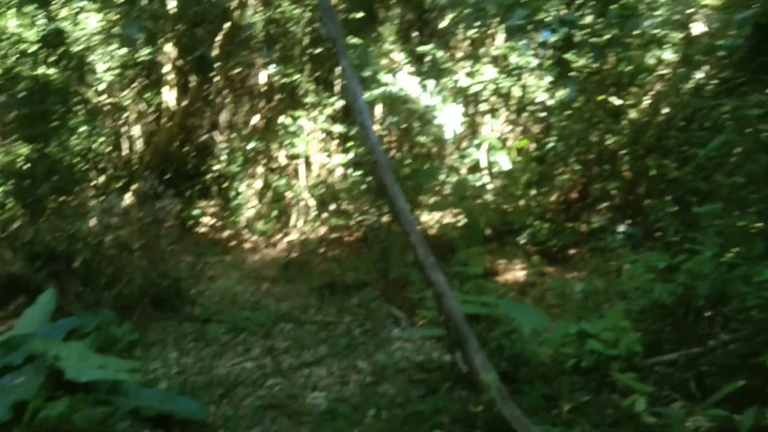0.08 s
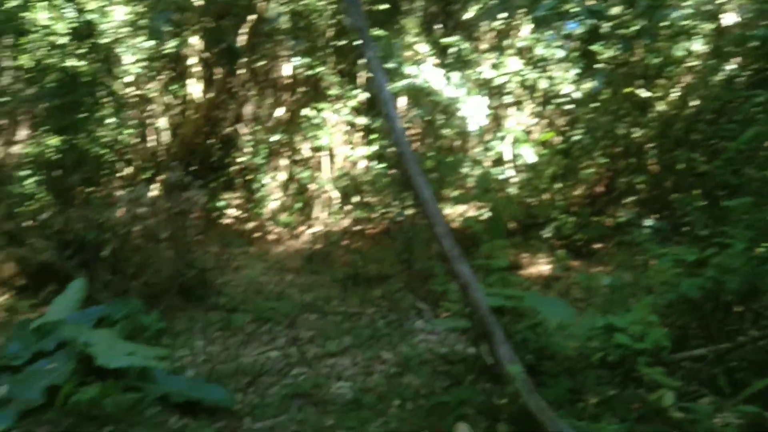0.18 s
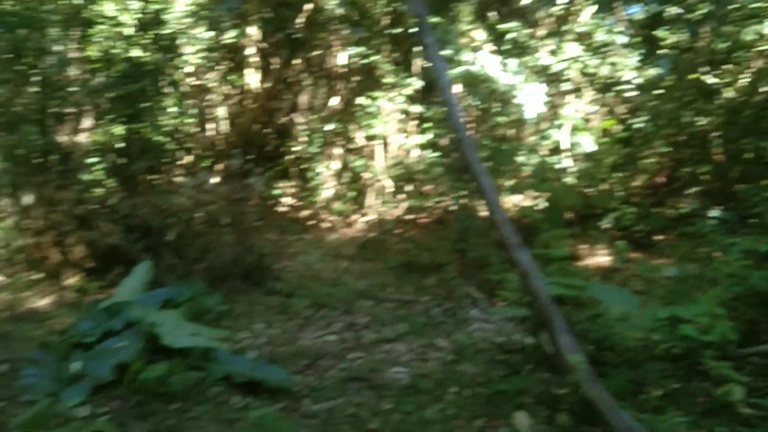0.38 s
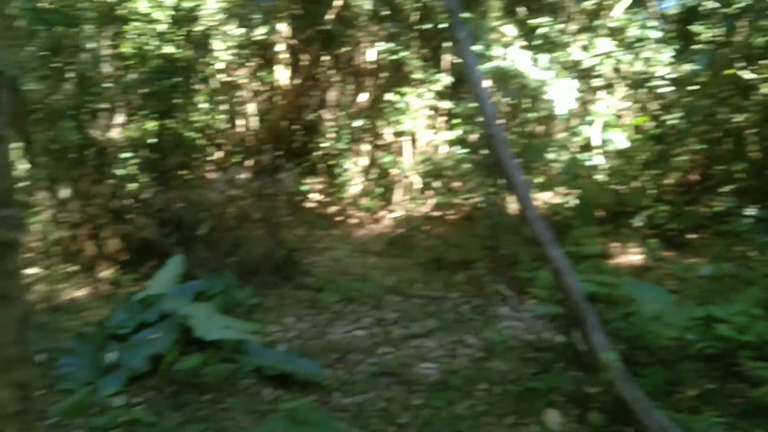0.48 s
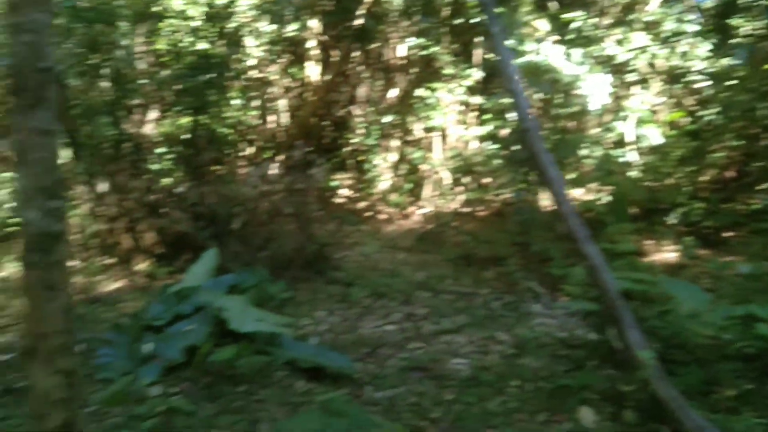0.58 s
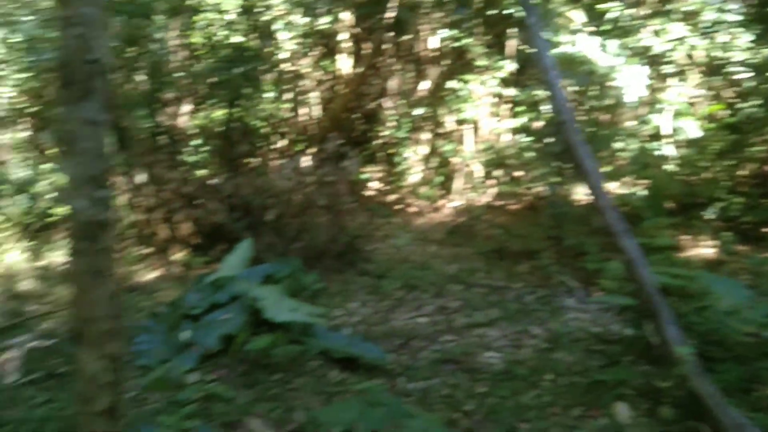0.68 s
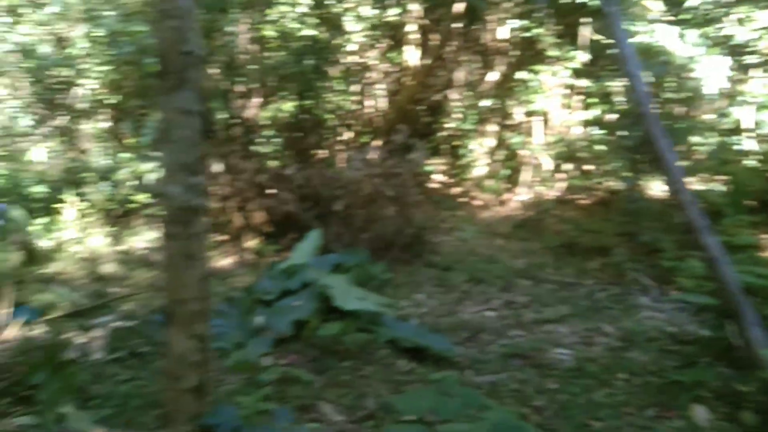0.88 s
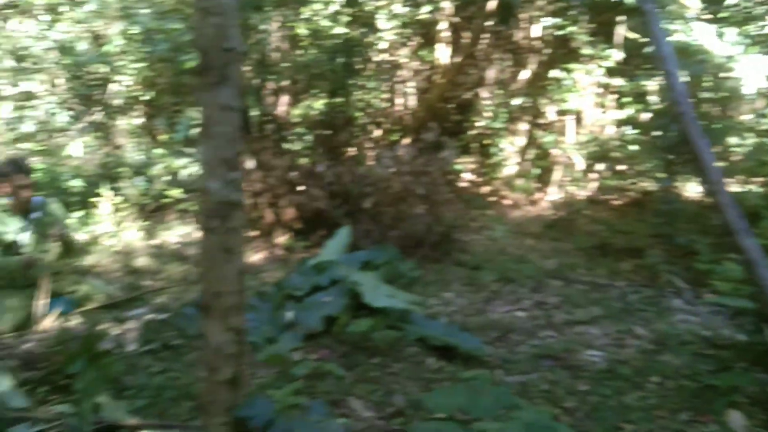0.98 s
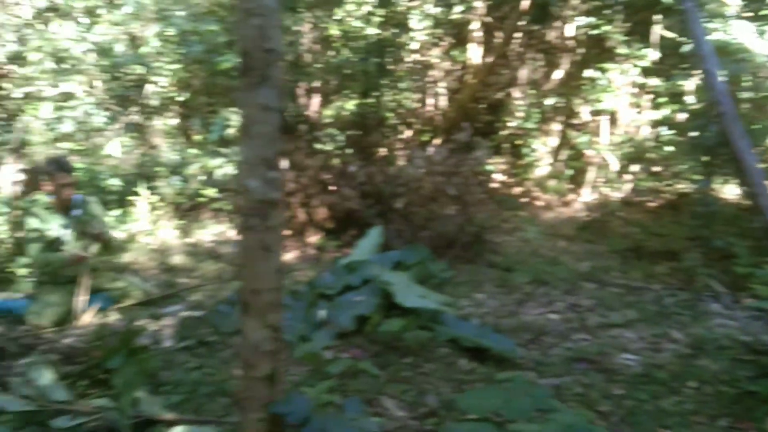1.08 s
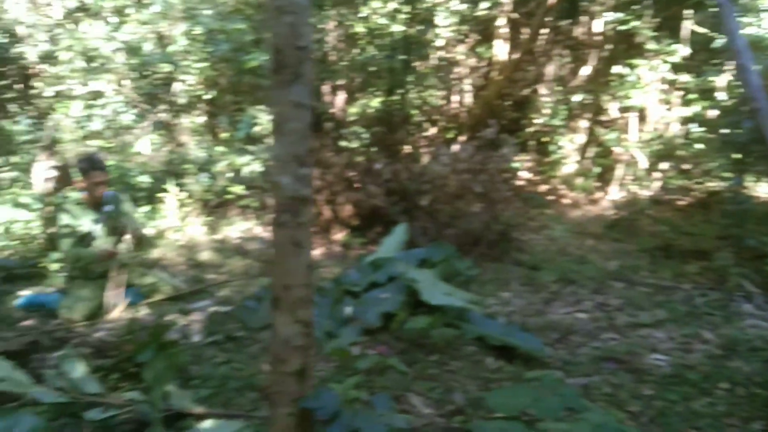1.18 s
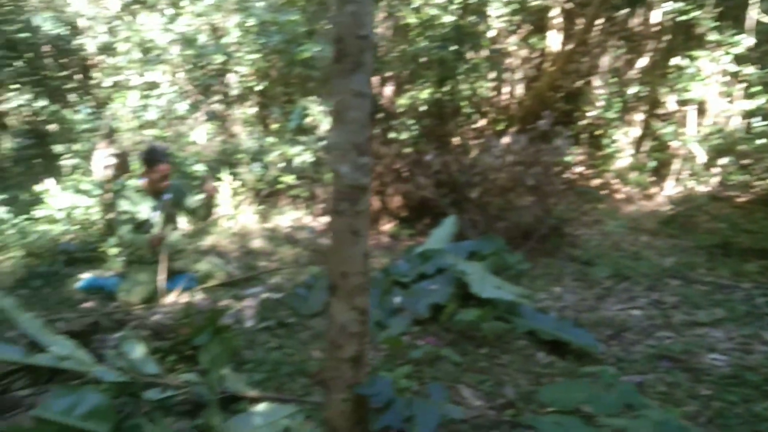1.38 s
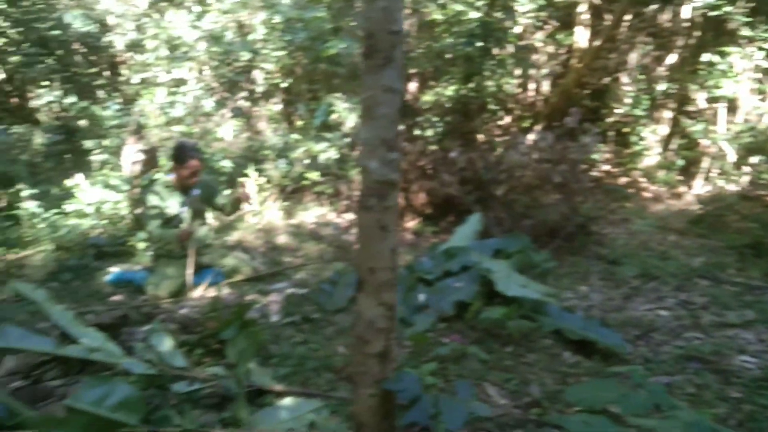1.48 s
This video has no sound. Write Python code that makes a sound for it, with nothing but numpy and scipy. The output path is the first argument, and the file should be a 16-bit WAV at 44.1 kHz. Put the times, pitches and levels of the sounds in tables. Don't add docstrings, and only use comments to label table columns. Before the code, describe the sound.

A close footstep crunches dry leaves and snaps twigs on a quiet forest floor

```python
import sys
import numpy as np
from scipy import signal
from scipy.fft import rfft, irfft
from scipy.io import wavfile
from scipy.ndimage import uniform_filter1d

SR = 44100
rng = np.random.default_rng(int(sys.argv[2]) if len(sys.argv) > 2 else 0)


def unload_wav(signal):
    wavfile.write(
        sys.argv[1],
        SR,
        np.round(np.clip(np.atleast_2d(signal).T, -1, 1) * 32767).astype(np.int16),
    )


def level_to_linear(level):
    exponent = np.asarray(level, float) / 20
    return 10 ** exponent


N = 66150


def at_hz(points, hz, axis=1):
    points = np.array(points)
    return np.interp(np.log(hz), np.log(points[:, 0]), points[:, axis])


def rms_one(x):
    return x / np.sqrt(np.mean(x ** 2) + 1e-20)


def band_pass(x, low_hz, high_hz, order=2):
    return signal.sosfilt(signal.butter(order, [low_hz, high_hz], "band", fs=SR, output="sos"), x)


def drift(rate_hz):
    r = np.exp(-2 * np.pi * rate_hz / SR)
    wander = signal.lfilter([1], [1, -2 * r, r * r], rng.standard_normal(N + SR))
    return rms_one(wander[SR:])


def ring(clicks, hz, t60):
    r = level_to_linear(-60 / (t60 * SR))
    w = 2 * np.pi * hz / SR
    return signal.lfilter([0, np.sin(w)], [1, -2 * r * np.cos(w), r * r], clicks + 1e-18)


def coloured(x, spectrum, peaks=()):
    hz = np.maximum(np.arange(len(x) // 2 + 1) * SR / len(x), 1)
    lift_db = sum(db / (1 + ((hz - mid) / width * 2) ** 2) for mid, width, db in peaks)
    return rms_one(irfft(rfft(x) * level_to_linear(at_hz(spectrum, hz) + lift_db), len(x)))


def crackle(spectrum, peaks):
    cracks_per_s, spread_db, cycles, clump_db = 16000, 2.5, 7.0, 1.5
    sizes = level_to_linear(spread_db * np.minimum(rng.exponential(1, N), 5)) * rng.choice([-1, 1], N)
    born = rng.random(N) < cracks_per_s * level_to_linear(clump_db * drift(150)) / SR
    pitches = np.geomspace(250, 16000, 30)
    dealt = rng.integers(0, 30, N)
    flat = np.zeros(N)
    for k, hz in enumerate(pitches):
        rung = ring(sizes * born * (dealt == k), hz, cycles / hz)
        flat += rms_one(rung) * np.sqrt(hz)
    return coloured(flat, spectrum, peaks)


# (pitch [Hz], level [dB per Hz])
AIR_COLOUR = [(30, -16), (100, -2), (300, -9), (800, -12.5), (4400, -19), (6500, -20.5), (8500, -33),
              (15500, -32.5)]


def air():
    hiss = level_to_linear(-68.5) * coloured(rng.standard_normal(N), AIR_COLOUR)
    rumble = rms_one(band_pass(rng.standard_normal(N), 60, 266))
    lumps_db = 3 * drift(34)
    return hiss + level_to_linear(-73 + lumps_db) * rumble


# (start [s], end [s], pitch [Hz], width [Hz], level [dB])
INSECT_CALLS = [
    (-.1, .85, 5950, 500, -80),
    (.84, 1.04, 6230, 200, -78),
    (1.02, 1.6, 6200, 300, -72),
    (.865, .935, 2820, 250, -76),
    (.82, 1.02, 4270, 120, -79),
    (1.0, 1.08, 4380, 120, -76),
    (1.04, 1.13, 2250, 120, -79),
    (.57, .72, 3450, 400, -78),
]


def insects():
    trill_per_s, depth, fade_s, evenness = 48, .55, .02, .6
    out, t = np.zeros(N), np.arange(N) / SR
    for start, end, hz, width, db in INSECT_CALLS:
        call = band_pass(rng.standard_normal(N), hz - width / 2, hz + width / 2)
        envelope = np.abs(signal.hilbert(rms_one(call)))
        call = rms_one(call / (envelope + .1) ** evenness)
        throb = 1 + depth * np.sin(2 * np.pi * trill_per_s * t + .6 * drift(4))
        fade = np.clip(np.minimum(t - start, end - t) / fade_s, 0, 1)
        out += level_to_linear(db) * call * throb * fade
    return out


# (time [s], level [dB], decay [dB per s])
LITTER_STIRS = [
    (.0, -71.5, 91),
    (.63, -65, 111),
    (1.029, -62.5, 60),
    (1.082, -76, 55),
    (1.165, -70, 68),
    (1.23, -79, 38),
    (1.313, -66.5, 75),
]
# (pitch [Hz], level [dB per Hz])
LITTER_COLOUR = [(250, -4), (500, 3.5), (1500, -7), (3500, -3.5), (6000, -7), (7500, -18), (11000, -24),
                 (15500, -30)]


def stirred_litter():
    t = np.arange(N) / SR
    level = np.zeros(N)
    for s, db, fall in LITTER_STIRS:
        level += level_to_linear(db - fall * np.maximum(t - s, 0)) * (t >= s)
    return uniform_filter1d(level, size=80) * crackle(LITTER_COLOUR, [])


# (time [s], peak level [dB], pitch [Hz], ring t60 [s])
SOIL_THUDS = [(0.0419, -47.5, 235, 0.014), (0.08, -59, 202, 0.033), (0.281, -49.5, 100, 0.073),
              (0.315, -42.5, 91.5, 0.066), (.345, -48.5, 86, 0.09), (.43, -51.5, 78, 0.069),
              (0.459, -51, 91, .1), (0.502, -55, 105, 0.057), (0.601, -60, 68, 0.11),
              (0.643, -53.5, 113, 0.12), (.77, -55, 103, 0.076), (.81, -56, 75, 0.11),
              (0.886, -56, 203, 0.054), (1.028, -45.5, 98, .1), (1.0505, -48, 105, .08),
              (1.0835, -52, 100, .09), (1.1664, -42.5, 92, .065), (1.3112, -49, 210, .03),
              (1.3148, -45, 104, .085), (1.194, -56.5, 191, 0.16), (1.441, -53.5, 124, .06)]


def thuds():
    extra_pitch, sag_s, rise_s, lead_rad = .4, .003, .0005, 1.5
    out, t = np.zeros(N), np.arange(N) / SR
    for s, db, hz, t60 in SOIL_THUDS:
        u = np.maximum(t - s, 0)
        phase = 2 * np.pi * hz * (u + extra_pitch * sag_s * (1 - np.exp(-u / sag_s)))
        rise = 1 - np.exp(-(u / rise_s) ** 2)
        out += level_to_linear(db - 60 * u / t60) * rise * np.cos(phase - lead_rad)
    return out


# (pitch [Hz], level [dB], t60 [s])
TRUNK_ECHO = [(100, 7.5, 1), (370, -12, 1), (930, -17.5, 0.78), (2160, -4.5, 0.58), (3460, -18, 0.73),
              (5560, -11.5, 0.43), (11500, -14, 1)]


def wood(x):
    t, echo = np.arange(N) / SR, np.zeros(N)
    edges = 60 * 2 ** np.arange(0, 8.6, .5)
    for low, high in zip(edges, edges[1:]):
        noise = band_pass(rng.standard_normal(N), low, min(high, 20000))
        hz = np.sqrt(low * high)
        t60 = at_hz(TRUNK_ECHO, hz, axis=2)
        even_energy = np.sqrt(6 * np.log(10) / t60 / SR)
        echo += noise * level_to_linear(at_hz(TRUNK_ECHO, hz) - 60 * t / t60) * even_energy
    build_up = 1 - np.exp(-(t / 0.0027) ** 2)
    return signal.fftconvolve(x, echo * build_up)[:N]


# (time [s], level [dB])
FOOT_WEIGHT = [
    (0.205, -70),
    (0.213, -44),
    (0.239, -41.5),
    (0.276, -36.5),
    (0.283, -35),
    (0.294, -32.5),
    (0.313, -35),
    (0.318, -40.5),
    (.37, -50.5),
]
# (pitch [Hz], level [dB per Hz])
LEAF_COLOUR = [(250, -29.5), (1200, -14), (2400, -18), (3600, -4.5), (5400, -10), (7200, -15.5),
               (12500, -34), (15500, -29)]
# (pitch [Hz], width [Hz], lift [dB])
LEAF_HUMPS = [(2030, 630, 9), (3600, 1300, 6), (5660, 860, 9), (6630, 640, 8.5)]


def foot():
    s, db = np.transpose(FOOT_WEIGHT)
    weight_db = np.interp(np.arange(N) / SR, s, db, left=-120, right=-120)
    return level_to_linear(weight_db) * crackle(LEAF_COLOUR, LEAF_HUMPS)


# (time [s], peak level [dB], pitch [Hz], ring t60 [s])
TWIG_SNAPS = [(0.2102, -37.5, 3500, 0.015), (0.2145, -35.5, 2150, 0.015), (0.215, -41, 4770, 0.0044),
              (0.2194, -44.5, 2360, 0.0043), (0.2267, -34, 4200, 0.0046), (0.2409, -27, 4540, 0.0077),
              (0.2636, -34, 2280, 0.016), (0.265, -44, 3530, 0.011), (.2735, -26, 3600, .02),
              (0.2835, -14, 4000, 0.0064), (0.283, -21, 5450, 0.0089), (0.2866, -19, 5310, 0.012),
              (0.2905, -31, 5200, .01), (.2992, -20, 3600, 0.016), (0.3091, -20.5, 4180, 0.0058),
              (0.3117, -27, 478, 0.018), (.3122, -32, 658, 0.021), (0.3115, -22, 3740, 0.0074),
              (.313, -26.5, 985, 0.014), (.3005, -27, 4960, 0.0091), (.305, -25, 4630, 0.014),
              (.322, -49, 562, 0.044), (.3455, -28, 1966, 0.014), (0.3466, -30.5, 3770, 0.012),
              (.913, -57.5, 1900, 0.0085), (.81, -62, 795, 0.021)]


def twigs():
    click_db, side_db, splinter_s, top_hz = -8, -6.5, 0.0011, 7200
    out, chance = np.zeros(N), rng.random((len(TWIG_SNAPS), 5))
    for (s, db, hz, t60), c in zip(TWIG_SNAPS, chance):
        clicks = np.zeros(SR // 8)
        later = 1 + c[:2] * splinter_s * SR
        clicks[[0, *later.astype(int)]] = [1, -.6, .5]
        upper = ring(clicks, hz * (1.25 + .2 * c[2]), t60 * .5)
        lower = ring(clicks, hz * (.6 + .2 * c[3]), t60 * .5)
        sound = ring(clicks, hz, t60) + level_to_linear(side_db) * (upper - lower) + level_to_linear(click_db) * clicks
        sound = band_pass(sound, 200, top_hz)
        i = int(s * SR)
        out[i:i + len(clicks)] += (level_to_linear(db) * sound / np.abs(sound).max())[:N - i]
    return out


# (time [s], peak level [dB], lowest [Hz], highest [Hz])
DRY_TICKS = [(.2828, -34, 300, 11500), (.3118, -29, 300, 3000), (.3443, -28, 800, 5300),
             (.3552, -31, 150, 3000), (.584, -57, 1800, 3200), (.595, -56, 1800, 3200),
             (.9985, -56, 1400, 3000), (1.029, -54, 500, 5000), (1.083, -55, 1500, 5000),
             (1.1671, -55, 400, 2500), (1.312, -56, 300, 2000), (1.37, -56, 500, 5000)]


def ticks():
    t60, rise_s = .009, .0003
    t = np.arange(1024) / SR
    out = np.zeros(N + SR)
    fade = level_to_linear(-60 * t / t60) * (1 - np.exp(-t / rise_s))
    for s, db, low, high in DRY_TICKS:
        sound = band_pass(rng.standard_normal(len(t)) * fade, low, high, order=4)
        i = int(s * SR)
        out[i:i + len(t)] += level_to_linear(db) * sound / np.abs(sound).max()
    return out[:N]


def scene():
    background = air() + insects() + stirred_litter()
    soil = thuds()
    near = foot() + twigs() + ticks()
    return (background + soil + near + wood(near + 0.079 * soil))[None]


def band_limit(x):
    return signal.sosfilt(signal.butter(12, 15670, fs=SR, output="sos"), x)


def record(dry):
    mix = signal.sosfilt(signal.butter(3, 52, "high", fs=SR, output="sos"), dry)
    mix = signal.sosfilt(signal.cheby2(12, 60, 16400, fs=SR, output="sos"), mix)
    return band_limit(mix)


dry = scene()
out = record(dry)
unload_wav(out)
```